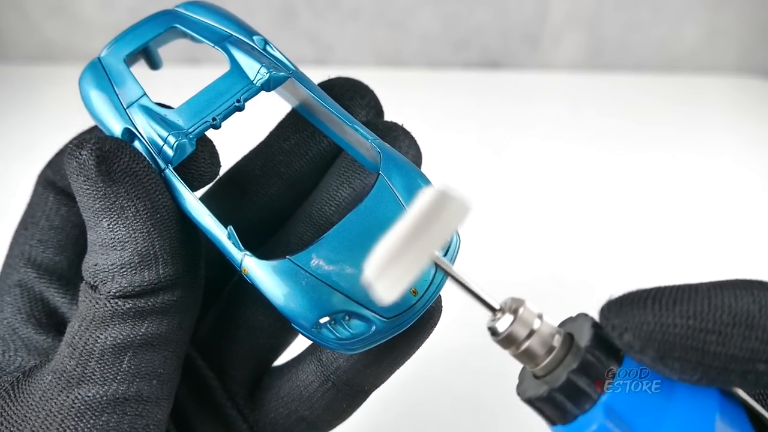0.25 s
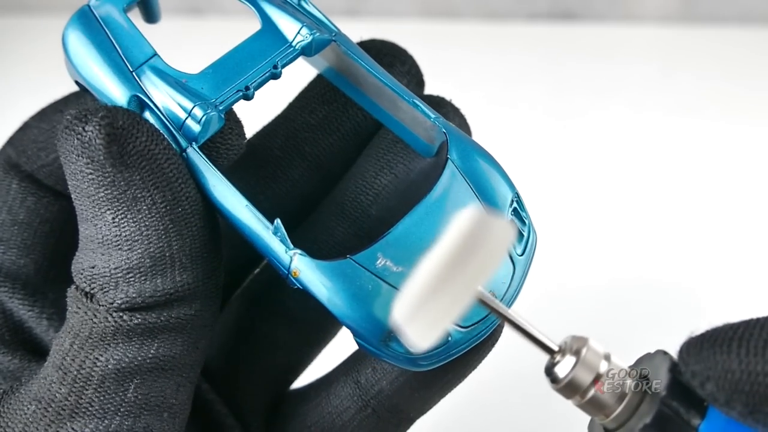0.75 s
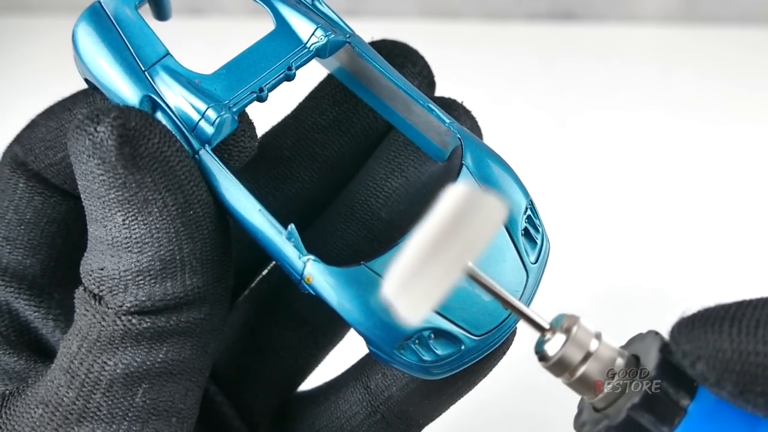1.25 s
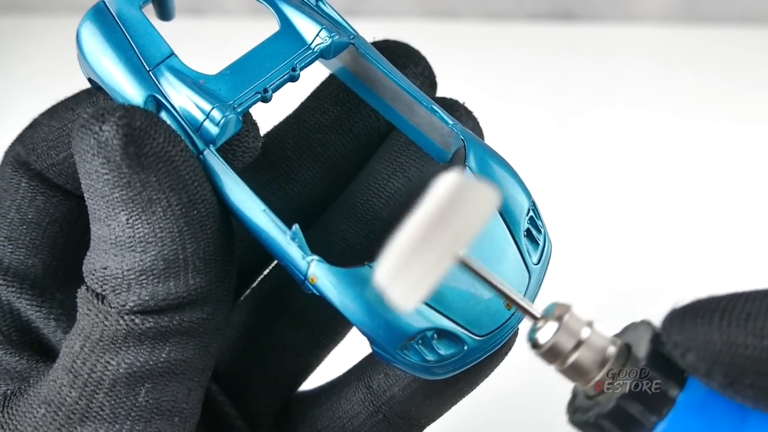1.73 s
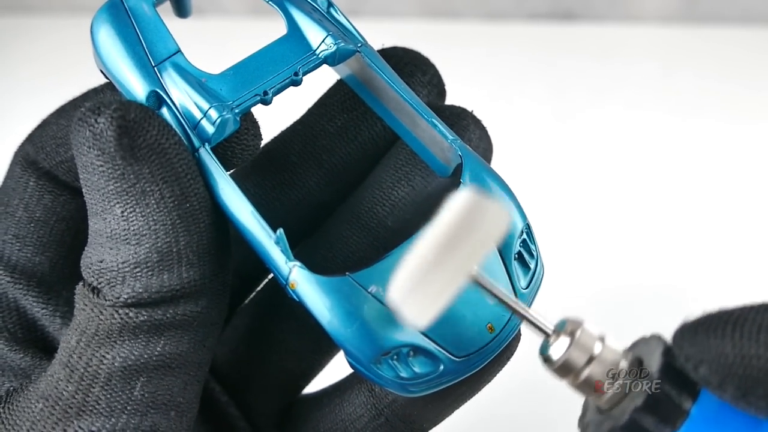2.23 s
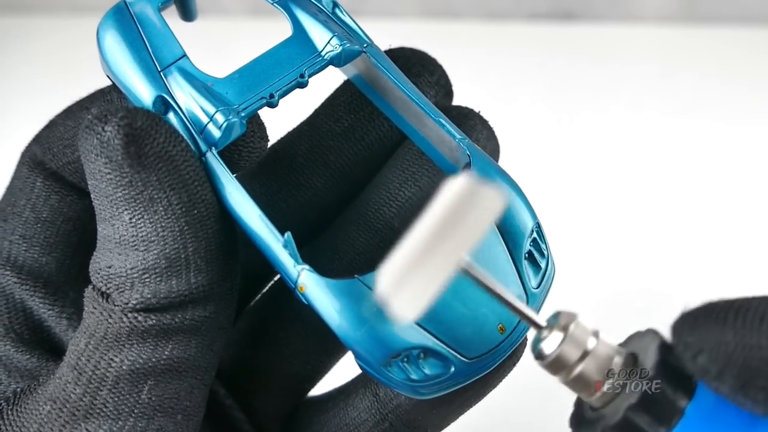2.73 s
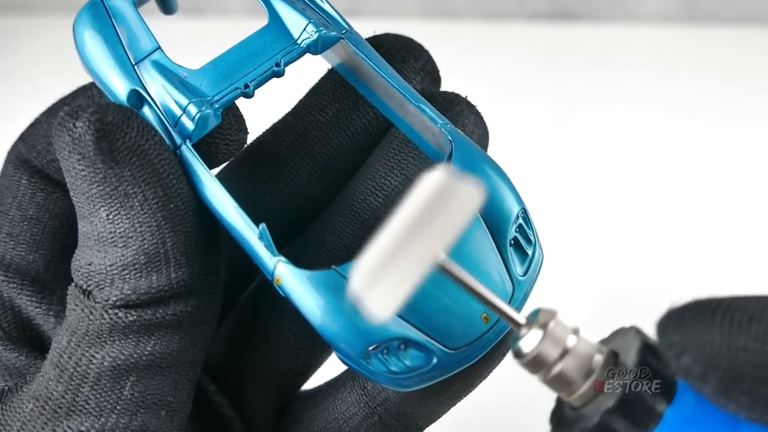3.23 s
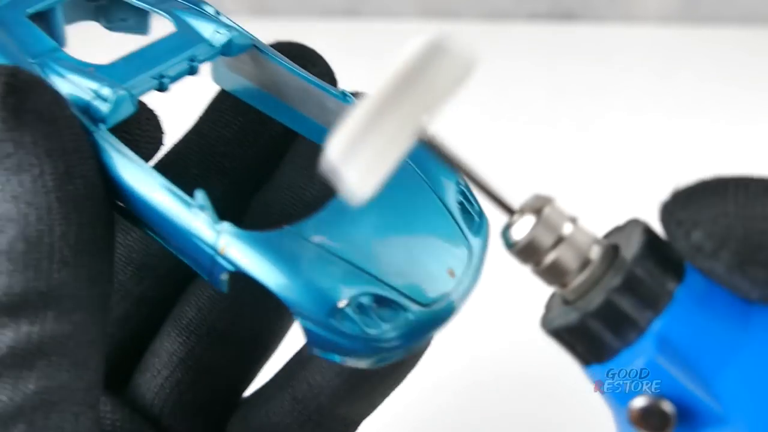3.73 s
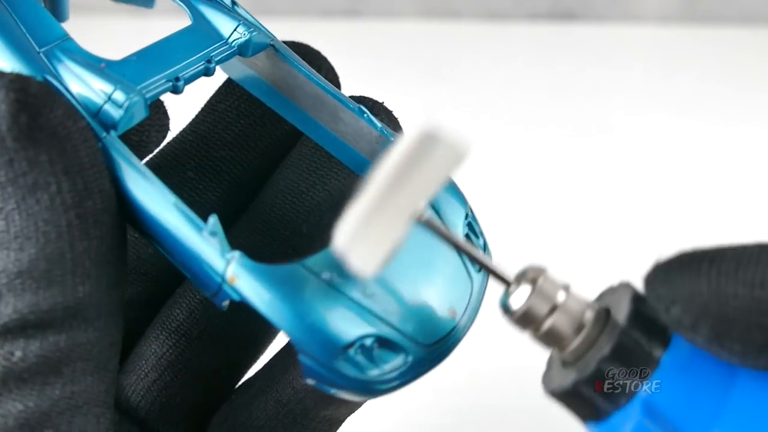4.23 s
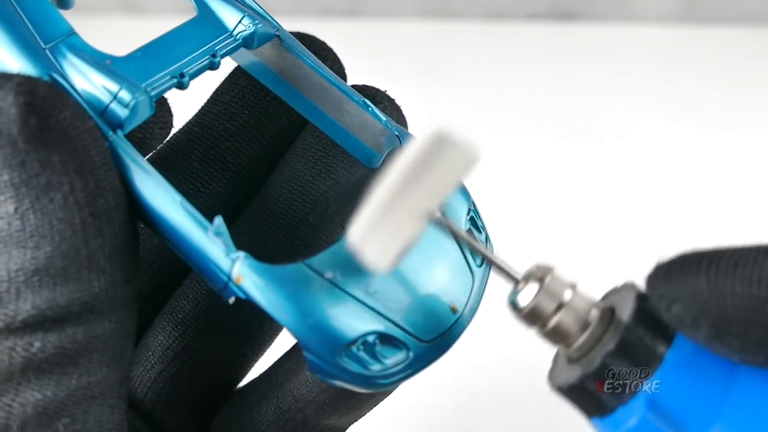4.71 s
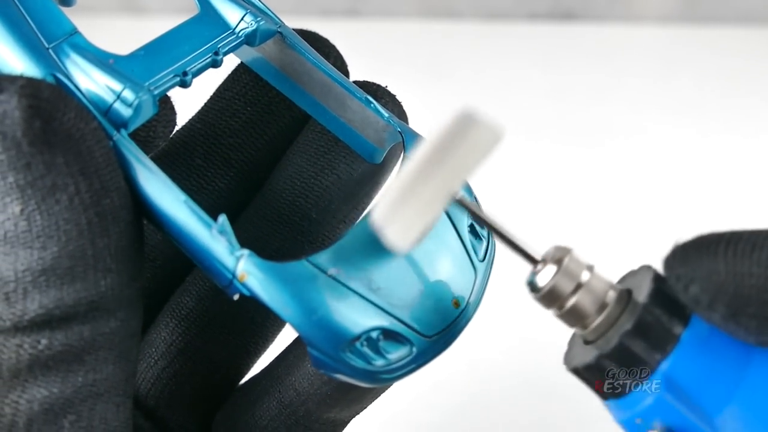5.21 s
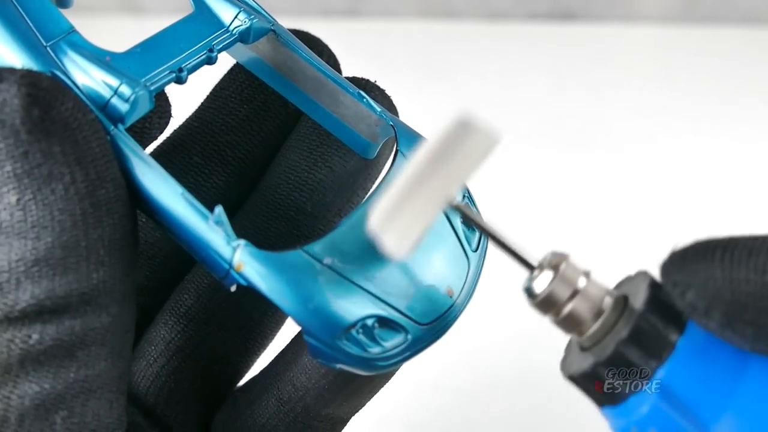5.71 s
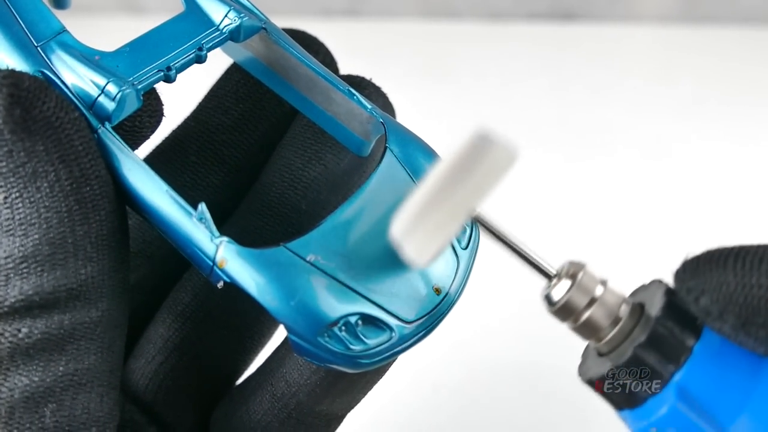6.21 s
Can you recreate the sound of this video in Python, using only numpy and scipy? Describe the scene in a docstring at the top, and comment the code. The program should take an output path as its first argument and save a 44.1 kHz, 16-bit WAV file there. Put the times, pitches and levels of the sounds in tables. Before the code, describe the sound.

The wavering electric whine of a handheld rotary tool polishing a metal toy car body, with short rasps and one brief, higher free spin.

```python
"""Rotary tool buffing a thin metal shell.

Shaft orders whine at a speed that sags under each stroke of the hand; bearings and felt
hiss in the housing. The out-of-round felt wheel knocks the shell once a turn and catches
on ridges. Lifted clear, the motor sings clean. Faint mains hum and room noise lie below."""
import sys
import numpy as np
from scipy import signal
from scipy.io import wavfile
from scipy.ndimage import uniform_filter1d

SR = 44100
rng = np.random.default_rng(int(sys.argv[2]) if len(sys.argv) > 2 else 0)


def wav_out(sig):
    """Save sig, one row per channel (or a flat mono array), as 16-bit PCM at SR to the path in sys.argv[1]."""
    wavfile.write(sys.argv[1], SR, np.round(np.clip(np.atleast_2d(sig).T, -1, 1) * 32767).astype(np.int16))


N = 284886
T = np.arange(N) / SR

LIGHT_UNTIL_S, TOUCH_S = 0.488, 4.08  # the opening scene ends; the lifted wheel starts to touch down
REFERENCE_HZ = 192  # reference speed in Hz for the imbalance level and the treble gap's timing


def shaft_speed():
    """Shaft speed in Hz and whine level in dB; both sag under each stroke of the hand."""
    # Wheel held still on the work. Each row: time in seconds, shaft speed in Hz, whine in dB.
    held = [(0.0, 152, -48), (0.036, 154.5, -49.5), (0.112, 150.8, -49), (0.194, 159.9, -47.5),
            (0.242, 159.8, -47.5), (0.324, 151.7, -48.5), (0.402, 153.6, -49.5), (0.48, 145.3, -50),
            (0.5, 127.3, -51), (0.57, 127.7, -53), (0.588, 130.2, -71), (0.61, 138.7, -39),
            (0.638, 139.5, -57), (0.662, 145.6, -40), (0.684, 144.4, -52), (0.7, 146.6, -43),
            (0.73, 147.6, -45), (0.744, 143.5, -49), (0.76, 143.4, -40), (0.78, 142, -45),
            (0.81, 132.8, -53), (0.852, 130.5, -49), (0.928, 120, -72), (1.048, 111.9, -50),
            (1.08, 110.8, -67), (1.164, 119.7, -56), (1.47, 119.1, -78)]
    # Lifted, spun up, set down in two touches. Each row: time in seconds, speed in Hz, whine in dB.
    lifted = [(3.63, 141.1, -44), (3.691, 176, -59), (3.728, 185.3, -59), (3.761, 186.1, -50),
              (3.826, 187.6, -50), (4.1, 187.5, -50), (4.135, 181, -52), (4.185, 184.7, -39),
              (4.235, 164.5, -53), (4.284, 174, -39)]
    # Each row: start in seconds, slowest speed in Hz, fastest in Hz, whine at the fastest in dB,
    # share of the stroke before the fastest point.
    strokes = [(1.507, 112.5, 131, -49, 0.5), (1.67, 115.2, 134.9, -47.5, 0.56),
               (1.816, 110.8, 129.7, -49.5, 0.61), (1.941, 121, 140.3, -47.5, 0.54),
               (2.051, 130.2, 133.5, -48, 0.47), (2.145, 126.6, 135.3, -50, 0.58),
               (2.24, 112.4, 128.2, -49, 0.43), (2.335, 112.4, 138, -46.5, 0.55),
               (2.429, 128.9, 146.1, -45.5, 0.38), (2.519, 130.6, 141.3, -46, 0.59),
               (2.634, 125.4, 140, -47, 0.43), (2.739, 132.7, 163.8, -41, 0.6),
               (2.854, 135.7, 156.6, -44, 0.68), (2.958, 133.6, 153.8, -46, 0.57),
               (3.068, 133, 145.1, -47.5, 0.64), (3.158, 134.9, 143.5, -47.5, 0.51),
               (3.253, 132.3, 151, -44.5, 0.4), (3.357, 139.1, 145.4, -47, 0.57),
               (3.442, 134.8, 149, -45.5, 0.59), (3.537, 136.5, 146.3, -48, 0.51),
               (4.355, 145.2, 158.8, -47.5, 0.42), (4.44, 136, 143.8, -48.5, 0.51),
               (4.54, 128.3, 136, -48.5, 0.48), (4.629, 127.6, 145.6, -47.5, 0.59),
               (4.724, 125.2, 145.2, -46, 0.62), (4.809, 124.2, 143.8, -46.5, 0.51),
               (4.909, 128.8, 139.4, -47.5, 0.53), (4.999, 127.5, 144.9, -46, 0.54),
               (5.099, 119.9, 148.4, -44, 0.52), (5.187, 128.1, 149.2, -47.5, 0.5),
               (5.293, 132.9, 149.8, -46.5, 0.45), (5.388, 131.4, 143.5, -46.5, 0.68),
               (5.468, 132, 150, -45.5, 0.56), (5.577, 137.4, 154, -47, 0.45),
               (5.682, 143.5, 161.4, -44, 0.5), (5.772, 133.5, 147.9, -46.5, 0.54),
               (5.862, 129.6, 141.4, -46.5, 0.62), (5.96, 127.8, 144.7, -47.5, 0.61),
               (6.045, 125.9, 140.1, -47, 0.51), (6.125, 119.1, 134, -48.5, 0.57),
               (6.2, 118.5, 133.4, -48.5, 0.72), (6.284, 124.7, 141.2, -45, 0.61),
               (6.366, 131.4, 144.3, -47.5, 0.52)]
    last_stroke_s, sag_db_per_hz, whine_lead_s = 0.1004, 0.42, 0.0047
    start_s, slow_hz, fast_hz, eased_db, share = np.transpose(strokes)
    length_s = np.diff(start_s, append=np.inf)
    length_s[length_s > 2 * last_stroke_s] = last_stroke_s
    pressed = np.transpose([start_s, slow_hz, eased_db - sag_db_per_hz * (fast_hz - slow_hz)])
    eased = np.transpose([start_s + share * length_s, fast_hz, eased_db])
    knot_s, *columns = np.array(sorted([*held, *lifted, *pressed, *eased], key=lambda row: row[0])).T
    knots = np.arange(len(knot_s))
    place = np.interp(T, knot_s, knots)
    stroking = (T > held[-1][0]) & (T < lifted[0][0]) | (T > lifted[5][0])
    place[stroking] -= np.sin(2 * np.pi * place[stroking]) / (2 * np.pi)  # hand slows at both ends
    hz, db = (uniform_filter1d(np.interp(place, knots, c), size=SR // 100) for c in columns)
    # The motor pulls hardest just before the shaft is back up to speed.
    return hz, np.where(stroking, np.interp(T + whine_lead_s, T, db), db)


def motor_whine(angle, shaft_hz, whine_db, free):
    """All shaft orders; the contact whine gives way to the free whine as the wheel lifts."""
    n = int(LIGHT_UNTIL_S * SR)
    contact = np.append(light_whine(angle[:n], whine_db[:n]), loaded_whine(angle[n:], whine_db[n:]))
    tones = (1 - free) * contact + imbalance(angle, shaft_hz, free)
    return np.sqrt(2) * (tones + stall_growl(angle) + free_whine(angle, free))


def light_whine(angle, whine_db):
    """Wheel brushing lightly: many nearly steady orders."""
    # Each row: shaft order, relative level in dB.
    low_orders = [(1, -13), (2, -12), (3, -9), (4, -16), (5, -13.5), (6, -4), (7, 2.5), (8, -37), (9, -30),
                  (10, -10), (11, -8.5), (12, -11), (13, -6), (14, -13), (15, -1.5), (16, -11), (17, -23),
                  (18, -8), (19, -35), (20, -11), (21, -27), (22, -21), (23, -29), (24, -16), (25, -27),
                  (26, -45), (27, -24)]
    high_orders = [(k, -17 + 4.9 * rng.standard_normal()) for k in range(len(low_orders) + 1, 66)]
    return undb(whine_db) * overtones(low_orders + high_orders, angle, shake_rad=0.011, flicker_db=1.5)


def loaded_whine(angle, whine_db):
    """Under load the rotor-slot tone pulses through a housing resonance; other orders hold steadier."""
    # Each row: shaft order, relative level in dB.
    orders = [(1, -13), (2, -17.5), (3, -19.5), (4, -10.5), (5, -9.5), (6, -8.5), (7, -3), (8, -10.5),
              (9, -41), (10, -10), (11, -25), (12, -11.5), (13, -9.5), (14, -10.5), (15, -8), (16, -11.5),
              (17, -8.5)]
    slots, peak_hz, width_hz, neighbour_db = 7, 937, 230, -16.5
    fall_hz_per_s, rise_hz_per_s, lag_s = 360, 730, 0.0065
    n = len(angle)
    other_orders = [row for row in orders if row[0] != slots]
    others = overtones(other_orders, angle, shake_rad=0.09, flicker_db=3, flicker_hz=45)
    shaft_hz = np.gradient(angle) * SR / (2 * np.pi)
    flutter = np.where(T[-n:] > 1.5, 0.8, 0.1)  # deeper once the hand strokes

    def resonance(k):
        return 1 / np.hypot(1, (k * shaft_hz - peak_hz) / width_hz)

    def tone(k):
        pulses = np.tanh(1.3 + flutter * walk(50, n))
        waver_rad = (0.3 + 0.5 * flutter) * walk(60, n)
        return resonance(k) * pulses * np.sin(k * angle + waver_rad)

    # The slot tone fades while the speed changes fast.
    slew_hz_per_s = np.roll(np.gradient(shaft_hz) * SR, int(lag_s * SR))
    steady = 1 / (1 + (slew_hz_per_s / np.where(slew_hz_per_s < 0, fall_hz_per_s, rise_hz_per_s)) ** 2)
    slot_tone = tone(slots) + undb(neighbour_db) * resonance(slots - 1) * tone(slots - 1)
    others_db = uniform_filter1d(whine_db, size=SR // 6) - 4
    return undb(whine_db) * steady * slot_tone + undb(others_db) * others


def free_whine(angle, free):
    """Wheel off the work: clean orders far into the treble; the high ones lock in last."""
    # Each row: shaft order, relative level in dB.
    orders = [(1, -5), (2, -24), (3, -24), (4, -14), (5, -15), (6, -1), (7, 0), (8, -6), (9, -25),
              (10, -16), (11, -4), (12, -13), (13, -7), (14, -4), (15, -2), (16, -15), (17, -8), (18, -1),
              (19, -18), (20, -7), (21, -7), (22, -21), (23, -19), (24, -28), (25, -23), (26, -18),
              (27, -24), (28, -23), (29, -22), (30, -20), (31, -19), (32, -14), (33, -8), (34, -20),
              (35, -17), (36, -28), (37, -13), (38, -13), (39, -10), (40, -12), (41, -23), (42, -19),
              (43, -16), (44, -11), (45, -11), (46, -18), (47, -14), (48, -10), (49, -7), (50, -9),
              (51, -2), (52, -4), (53, -13), (54, -13), (55, -14), (56, -20), (57, -21), (58, -13),
              (59, -12), (60, -13), (61, -27), (62, -29), (63, -25), (64, -28), (65, -25), (66, -17),
              (67, -29), (68, -21), (69, -24), (70, -20), (71, -20), (72, -25), (73, -19), (74, -27),
              (75, -24), (76, -28), (77, -25), (78, -26), (79, -26), (80, -26), (81, -25), (82, -26),
              (83, -15), (84, -34)]
    level_db, cage_hz, cage_above_order = -43.5, 115, 46
    gap_s, gap_length_s = 3.735, 0.013  # a dark gap climbs the treble during the lift
    gap_from_hz, gap_to_hz, gap_hz_per_s = 4934, 10800, 82000
    on = free > 0
    t, lift, n = T[on], free[on], on.sum()
    dulling = np.interp(t, [TOUCH_S, TOUCH_S + 0.06], [1, 10])
    out = np.zeros(N)
    for k, db in orders[1:]:
        locked = lift ** (1 + dulling * (k / 20) ** 2)
        crossing_s = gap_s + (k * REFERENCE_HZ - gap_from_hz) / gap_hz_per_s
        gap = (gap_from_hz < k * REFERENCE_HZ < gap_to_hz) * np.exp(-((t - crossing_s) / gap_length_s) ** 2)
        bearing_beat = 1 + (k > cage_above_order) * 0.5 * np.cos(2 * np.pi * cage_hz * t + walk(20, n))
        flicker_db = 0.03 * min(k, 40) * walk(30, n)
        waver_rad = (0.0035 + 0.068 * (1 - lift)) * k * walk(60, n)
        gain = locked * (1 - gap) * bearing_beat * undb(level_db + db + flicker_db)
        out[on] += gain * np.sin(k * angle[on] + waver_rad + 7 * rng.random())
    return out


def imbalance(angle, shaft_hz, free):
    """First shaft order: stronger with speed and with the wheel lifted."""
    db_per_octave, lifted_db = 30, 4.5
    level_db = -52.5 + db_per_octave * np.log2(shaft_hz / REFERENCE_HZ) + lifted_db * free
    return undb(level_db + 0.87 * walk(30) * (2 - free)) * np.sin(angle)


def stall_growl(angle):
    """Wheel pressed near to stalling: a dense stack of low orders."""
    # Each row: shaft order, relative level in dB.
    orders = [(1, -22), (2, -14.5), (3, -13.5), (4, -24), (5, -7), (6, -10), (7, -3), (8, -3), (9, -3.5),
              (10, -3.5), (11, -6), (12, -3.5), (13, -13), (14, -4), (15, -5), (16, -3.5), (17, -18),
              (18, -6.5), (19, -8), (20, -5), (21, -21), (22, -24)]
    # Each row: time in seconds, gain in dB.
    levels = [(.86, -59), (.92, -59), (.98, -55), (1.0, -53.5), (1.06, -51), (1.11, -55), (1.125, -60.5),
              (1.25, -56.5), (1.47, -57), (1.5, -57.5), (1.54, -55)]
    on = (T > levels[0][0]) & (T < levels[-1][0])
    growl = np.zeros(N)
    growl[on] = overtones(orders, angle[on], shake_rad=0.015, flicker_db=1.5, flicker_hz=40)
    return undb(curve(levels)[0]) * growl


def shell_contact(angle):
    """The wheel's high spot knocks and scrapes the shell each turn; edge, ridges and panel ring."""
    # Steady rubbing on an edge. Each row: time in seconds, level in dB.
    edge_levels = [(0, -50), (.48, -45.5), (.5, -51.5), (.86, -53), (.9, -41), (.96, -40.5), (1.0, -53.5),
                   (1.08, -47), (1.11, -43), (1.125, -41.5), (1.25, -39), (1.36, -38.5), (1.47, -38.5),
                   (1.5, -52), (6.46, -53.5)]
    # Shell rubbed along its edge. Each row: centre in Hz, width in Hz, gain in dB.
    edge_modes = [(1950, 740, -3.5), (2330, 339, -14), (3200, 440, 3), (3445, 246, 7), (3760, 300, 1),
                  (4094, 470, -6.5), (6950, 300, 3), (8000, 760, -5.5), (9200, 900, -10),
                  (11840, 800, -10.5), (12600, 700, -15)]
    # Shell caught on a ridge. Each row: centre in Hz, width in Hz, gain in dB.
    ridge_modes = [(3525, 690, 1), (3785, 530, 1.5), (5359, 1920, -8), (7130, 700, -0.5),
                   (7560, 1660, -4.5), (11140, 1100, -7), (11980, 1300, -7)]
    # Low thud of the broad panel. Each row: centre in Hz, width in Hz, gain in dB.
    panel_modes = [(1170.8, 1020, 0), (1696, 720, 0.5), (2145, 480, -5)]
    turns = angle / (2 * np.pi)
    turn = turns.astype(int)
    knocks = unit(np.diff(turn, prepend=0) * undb(rng.standard_normal(turn[-1] + 1))[turn])
    scrape = unit(rng.standard_normal(N) * np.exp(-(turns % 1) / 7.6) * undb(0.44 * walk(300)))
    rasp_gain, thud_gain = ridge_catches()
    blows = hard_knocks(ridge_modes)
    # Each edge mode comes and goes as the wheel wanders.
    rubbing = sum(undb(1.2 * walk(25)) * ring(1.1 * knocks + scrape, [mode]) for mode in edge_modes)
    edge = undb(curve(edge_levels)[0]) * unit(rubbing)
    ridge = rasp_gain * unit(ring(0.59 * knocks + scrape, ridge_modes)) + ring(blows, ridge_modes)
    panel = thud_gain * unit(ring(0.7 * knocks + scrape, panel_modes))
    return edge + ridge + panel + undb(-18) * ring(blows, panel_modes)


def ridge_catches():
    """Rasp and thud envelopes: the wheel bites a ridge fast, holds and lets go slower."""
    # Each row: middle in seconds, rasp level in dB, length in seconds.
    catches = [(1.525, -43, 0.026), (1.625, -44, 0.036), (1.675, -41, 0.017), (1.77, -42, 0.017),
               (1.926, -43, 0.052), (2.129, -44, 0.041), (2.206, -49, .013), (2.249, -44.5, 0.02),
               (2.32, -54, 0.017), (2.403, -41, 0.031), (2.479, -51, 0.032), (2.618, -39.5, 0.031),
               (2.721, -40.5, 0.027), (2.833, -47.5, 0.035), (2.943, -38, 0.018), (3.046, -44, 0.033),
               (3.145, -41.5, 0.028), (3.343, -54, 0.061), (4.135, -46, .04), (4.202, -42.5, 0.036),
               (4.289, -42.5, 0.042), (4.523, -37.5, 0.031), (4.614, -39.5, 0.041), (4.707, -39.5, .036),
               (4.802, -40.5, 0.035), (4.894, -43, 0.028), (4.991, -37.5, 0.018), (5.092, -43, 0.033),
               (5.174, -40, 0.038), (5.269, -44.5, 0.019), (5.376, -51, 0.061), (5.756, -41.5, 0.027),
               (5.845, -38.5, 0.032), (5.939, -38, 0.032), (6.039, -46.5, 0.028), (6.125, -43.5, 0.02),
               (6.199, -48, 0.019), (6.26, -44.5, 0.0088), (6.352, -41.5, 0.026), (6.42, -43, 0.031)]
    firm_rasp_db, firm_thud_db = -43.5, -48
    rasp, thud = np.zeros((2, N))
    for middle_s, db, length_s in catches:
        near = slice(int((middle_s - 0.06) * SR), int((middle_s + 0.06) * SR))
        spread_s = np.where(T[near] < middle_s, 0.3, 0.4) * length_s
        grip = np.exp(-0.5 * np.abs((T[near] - middle_s) / spread_s) ** 3)
        rasp[near] += undb(db) * grip
        thud[near] += undb(firm_thud_db + 0.75 * (db - firm_rasp_db)) * grip
    return rasp, thud


def hard_knocks(modes):
    """The hardest single blows, softened by the felt and scaled by their peak through the modes."""
    # Each row: time in seconds, ringing peak in dB.
    knocks = [(2.4063, -26), (2.6143, -29), (2.9489, -22), (3.052, -26), (3.1476, -26), (4.5248, -23),
              (4.6074, -23.5), (4.6955, -28), (4.7039, -27), (4.788, -28.5), (4.8085, -27), (4.8862, -26),
              (4.9801, -24.5), (4.9879, -24), (4.9954, -26), (5.1682, -27), (5.7543, -27.5), (5.8371, -19),
              (5.9332, -21), (5.9405, -22), (6.2552, -31), (6.3444, -22), (6.3514, -24), (6.4233, -29),
              (6.4354, -27)]
    impulses = np.zeros(N)
    for time_s, db in knocks:
        impulses[int((time_s + 0.0006) * SR)] = undb(db)
    felt = np.hanning(8)
    return np.convolve(impulses, felt, "same") / np.abs(ring(np.pad(felt, 200), modes)).max()


def housing_hiss(angle, whine_db, free):
    """Bearings, brushes and felt: noise that throbs once a turn and rings the housing."""
    # Each row: time in seconds, hiss gain in dB, wall ring gain in dB.
    levels = [(0, -47.5, -49), (.25, -46, -49), (.484, -46.5, -45.5), (.494, -51.5, -56), (.7, -46, -49),
              (.98, -52.5, -56), (1.16, -48.5, -46.5), (1.45, -51, -59), (1.8, -50, -54.5),
              (2.35, -50, -53), (2.9, -48, -53), (3.5, -50, -53.5), (3.7, -47.5, -48.5), (4.0, -44, -63),
              (4.32, -49, -51), (5.2, -50, -55), (5.77, -49, -52), (6.06, -51, -58), (6.46, -48.5, -56)]
    # Housing resonances. Each row: centre in Hz, width in Hz, gain in dB.
    housing_modes = [(594, 1360, -2), (1100, 1020, 2), (1820, 540, -8), (3504, 720, 6.5), (3720, 460, 7),
                     (7630, 1040, 5), (8140, 540, 9), (9390, 1170, -0.5), (10140, 1500, 3),
                     (10980, 1830, -3), (12430, 2460, -5.5), (15660, 11800, 0.5)]
    # Housing wall resonances. Each row: centre in Hz, width in Hz, gain in dB.
    wall_modes = [(2120, 235, -0.5), (2330, 150, 2)]
    # Hiss band near 4.5-6.5 kHz. Each row: centre in Hz, width in Hz, gain in dB.
    band_modes = [(4585, 610, 7), (5140, 450, 7.5), (6030, 1400, 5)]
    # Each row: time in seconds, level of that band in dB.
    band_levels = [(0.0, -55), (0.3, -57), (0.45, -53.5), (1.06, -56), (1.28, -53), (1.71, -57),
                   (2.32, -55.5), (2.79, -50.5), (3.29, -53), (3.8, -53.5), (3.94, -63), (4.25, -50.5),
                   (4.79, -56), (5.78, -52.5), (6.19, -55.5), (6.46, -53)]
    hiss_db, wall_db = curve(levels)
    wall_db += 0.5 * (whine_db - uniform_filter1d(whine_db, size=SR // 6))  # rises as the wheel eases
    light = T < LIGHT_UNTIL_S
    air = rng.standard_normal(N) * (1 + 0.061 * np.cos(angle + walk(30))) * undb(0.81 * walk(60))
    grit = rng.standard_normal(N) * (1 + 0.5 * np.cos(angle + walk(30)))
    grit *= undb(np.where(light, 0.4, 1.2) * walk(25))
    taps = unit(np.diff(angle // (2 * np.pi), prepend=0))  # loose bearing, once a turn
    air += np.where(light, 0.7, 0.25) * taps
    grit += np.where(light, 0.8, 0.6) * taps
    treble_cut_db = 2.5 * free * (T < TOUCH_S)
    housing = sum(undb(1.2 * walk(3.98) - treble_cut_db * (mode[0] > 7000)) * ring(air, [mode])
                  for mode in housing_modes)
    band = undb(curve(band_levels)[0]) * unit(ring(air, band_modes))
    wall = undb(wall_db - 6.63 * free) * unit(ring(grit, wall_modes))
    return band + undb(hiss_db + 4 - 6 * free) * unit(housing) + wall


def deepen_valleys(x):
    """Darkens the valleys between resonances."""
    # Each row: centre in Hz, width in Hz, share removed.
    valleys = [(1515, 200, 0.25), (6960, 310, 0.78), (9080, 260, 0.32)]
    for hz, width_hz, share in valleys:
        x = x - share * signal.lfilter(*signal.iirpeak(hz, hz / width_hz, fs=SR), x)
    return x


def room_tone():
    """Mains hum and its octave over quiet hiss and rumble."""
    mains_hz, hum_db, octave_db, hiss_db, rumble_db = 60, -86, -77.5, -58, -82
    low_noise = signal.lfilter(*signal.butter(1, 500, fs=SR), rng.standard_normal((2, N)))
    floor = undb(hiss_db) * unit(np.diff(low_noise[0], prepend=0)) + undb(rumble_db) * unit(low_noise[1])
    hum = undb(hum_db + 0.8 * walk(20)) * np.sin(2 * np.pi * mains_hz * T)
    octave = undb(octave_db) * np.sin(4 * np.pi * mains_hz * T)
    return floor + np.sqrt(2) * (hum + octave)


def overtones(orders, angle, shake_rad, flicker_db, flicker_hz=25):
    """Shaft orders above the first; the angle shakes and the weaker orders flicker most."""
    shaken = angle + shake_rad * walk(45, len(angle))
    top_db = max(db for _, db in orders)
    out = 0
    for k, db in orders[1:]:
        drift_db = flicker_db * min(1, 0.91 + (top_db - db) / 8) * walk(flicker_hz, len(angle))
        out += undb(db + drift_db) * np.sin(k * shaken + 7 * rng.random())
    return out


def ring(x, modes):
    """Parallel resonances, each applied twice for dark valleys."""
    out = 0
    for hz, width_hz, db in modes:
        b, a = signal.iirpeak(hz, hz / width_hz / 1.036, fs=SR)
        out += undb(db) * signal.lfilter(b, a, signal.lfilter(b, a, x))
    return out


def walk(rate_hz, count=N):
    """Slow random drift, spread near 1."""
    place = T[:count] * rate_hz
    knots = int(place[-1]) + 2
    return 1.53 * np.interp(place, np.arange(knots), rng.standard_normal(knots))


def curve(rows):
    """Table columns interpolated over time."""
    time_s, *columns = np.transpose(rows)
    return [np.interp(T, time_s, c) for c in columns]


def undb(db):
    return 10 ** (np.asarray(db) / 20)


def unit(x):
    return x / np.sqrt(np.mean(x ** 2))


def scene():
    """One shaft drives whine, hiss and knocks; both channels are the same."""
    # Each row: time in seconds, share of the wheel off the work (0-1).
    lift = [(3.66, 0.07), (3.71, 0.75), (3.79, 0.98), (3.82, 1), (4.03, 0.99), (4.105, 1), (4.128, 0.72),
            (4.15, 0.97), (4.19, 1), (4.22, 0.06), (4.262, 0.05), (4.275, 0.7), (4.297, 0.64), (4.32, 0.05)]
    dip_s, dip_length_s = 0.491, 0.0028  # the whole sound drops out for a few milliseconds
    free = curve(lift)[0]
    shaft_hz, whine_db = shaft_speed()
    angle = 2 * np.pi * np.cumsum(shaft_hz) / SR
    whine = motor_whine(angle, shaft_hz, whine_db, free)
    friction = deepen_valleys(housing_hiss(angle, whine_db, free) + shell_contact(angle))
    dip = 1 - np.exp(-0.5 * ((T - dip_s) / dip_length_s) ** 4)
    mono = (whine + friction + room_tone()) * dip
    return np.array([mono, mono])


def record(dry):
    """Steep low-pass on the top treble."""
    cutoff_hz = 15720
    return signal.sosfilt(signal.ellip(14, 0.2, 90, cutoff_hz, fs=SR, output="sos"), dry)


dry = scene()
out = record(dry)
wav_out(out)
```